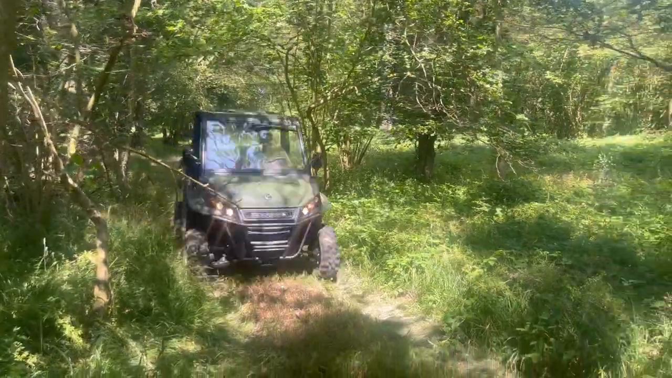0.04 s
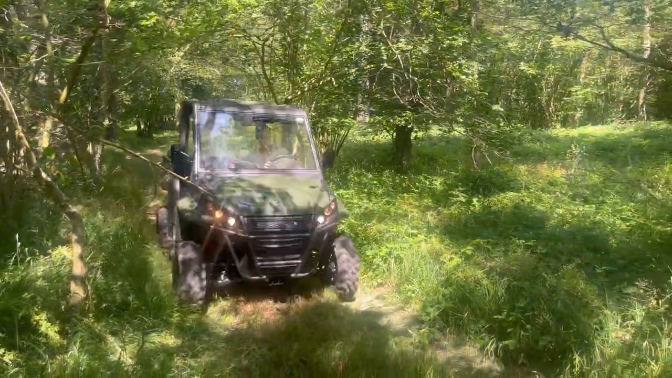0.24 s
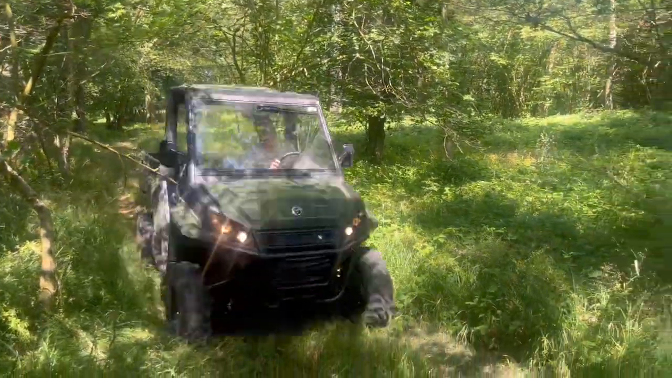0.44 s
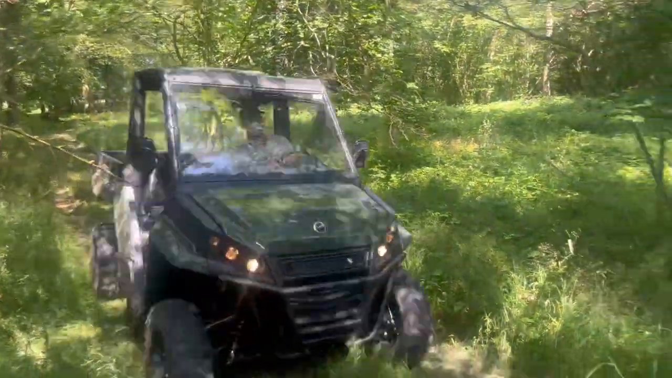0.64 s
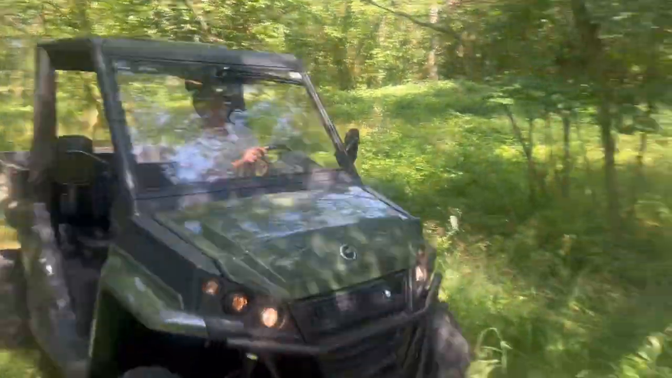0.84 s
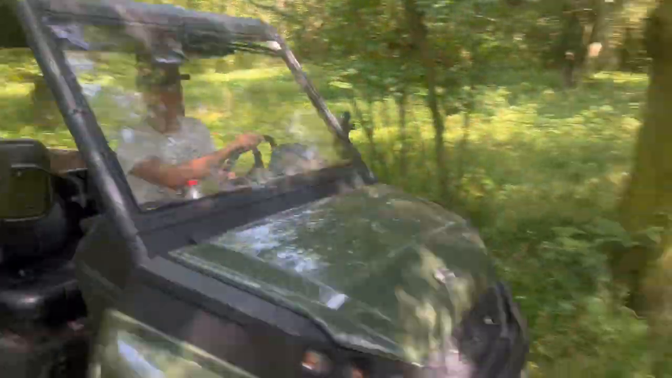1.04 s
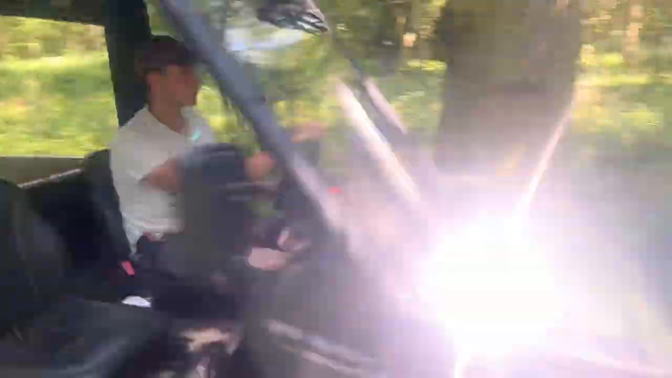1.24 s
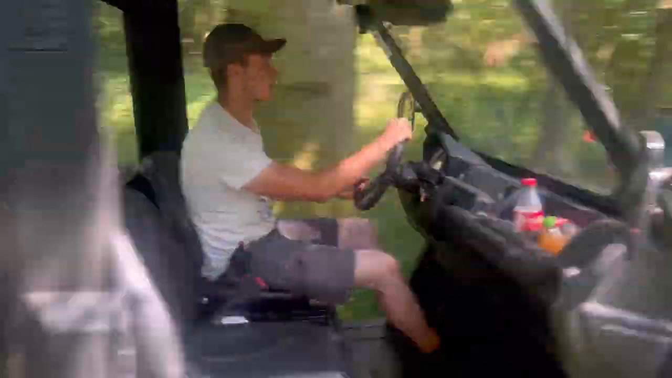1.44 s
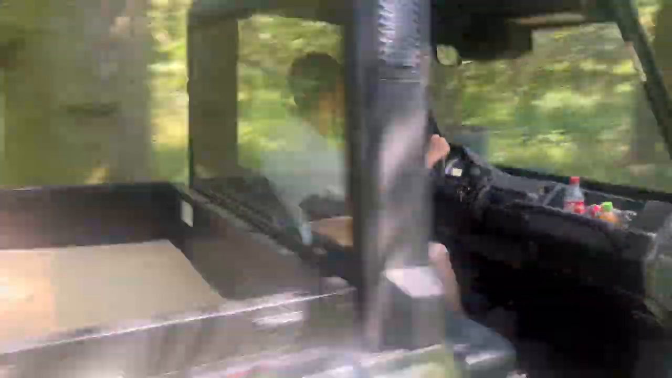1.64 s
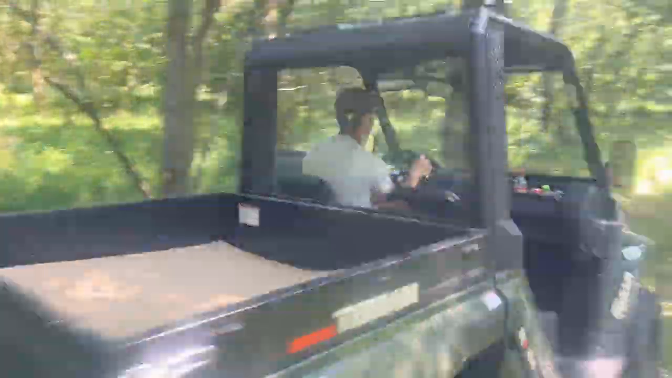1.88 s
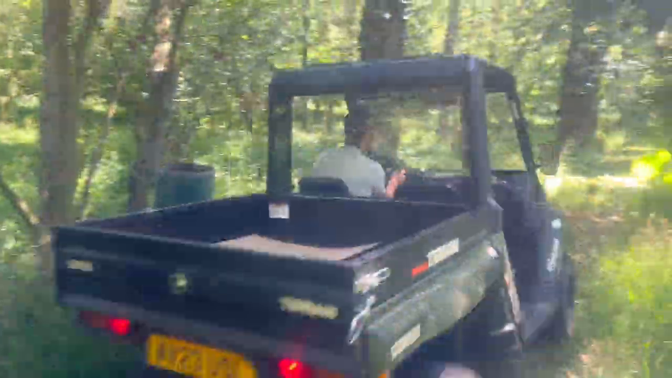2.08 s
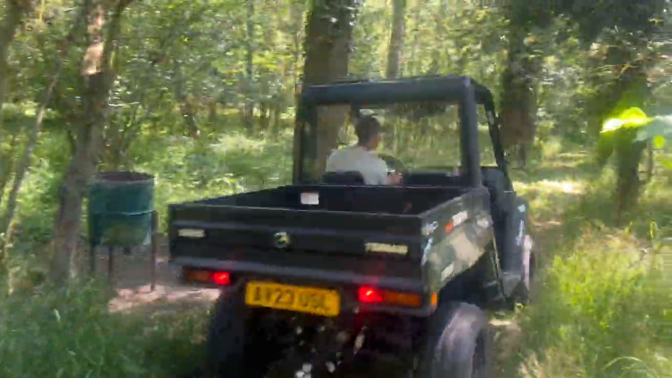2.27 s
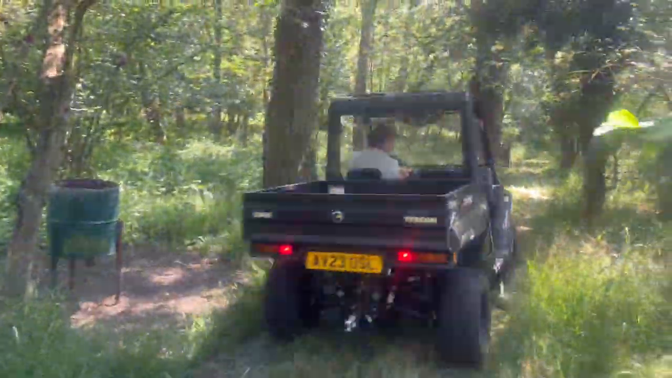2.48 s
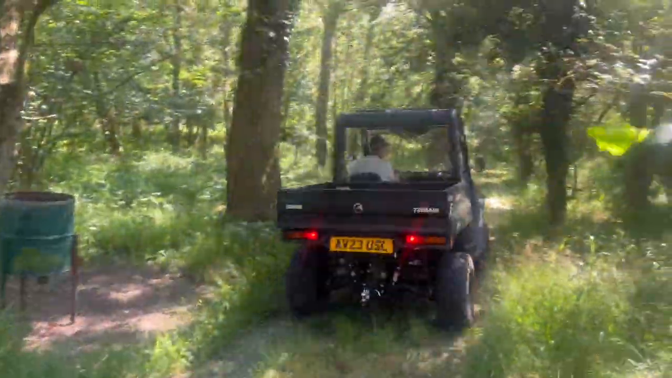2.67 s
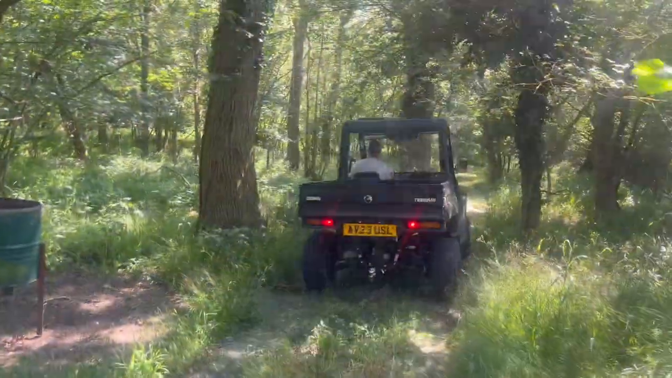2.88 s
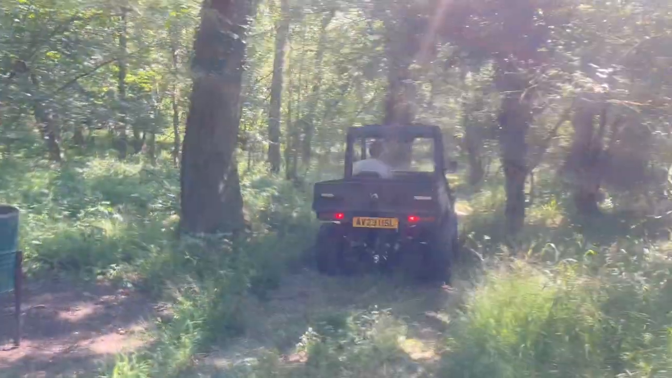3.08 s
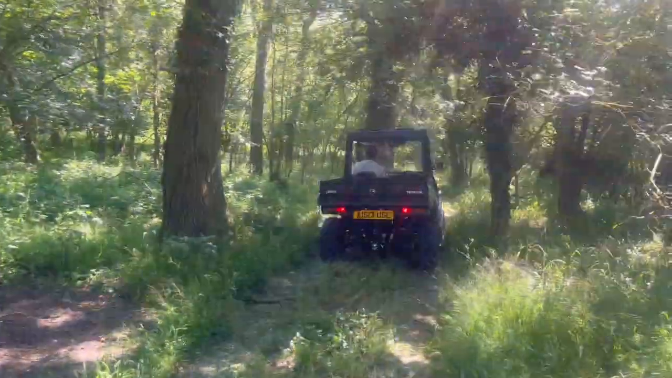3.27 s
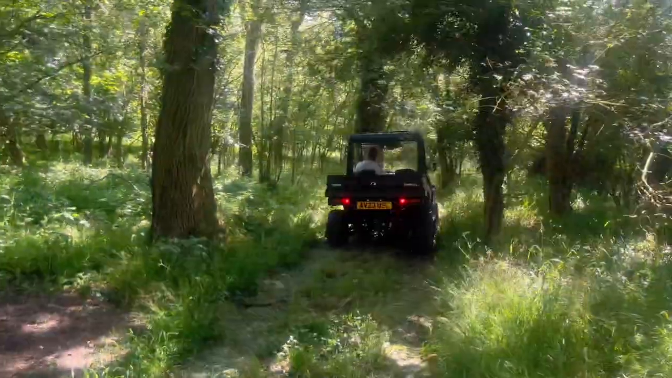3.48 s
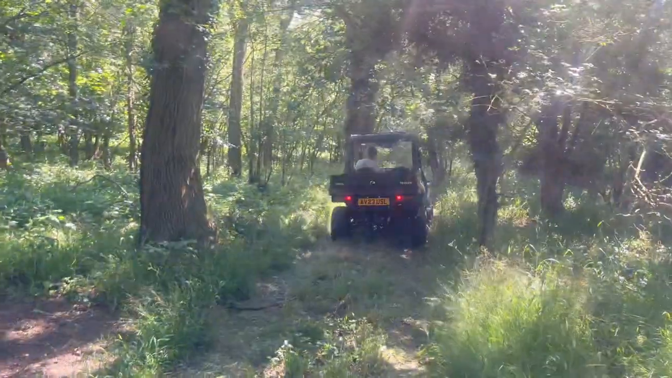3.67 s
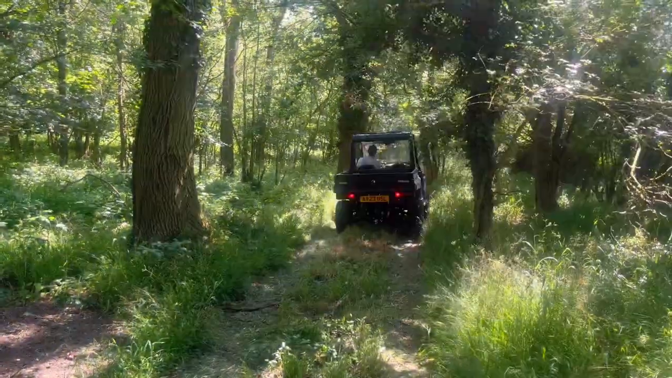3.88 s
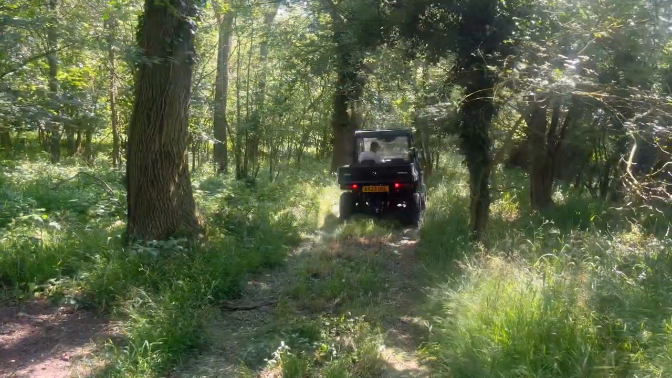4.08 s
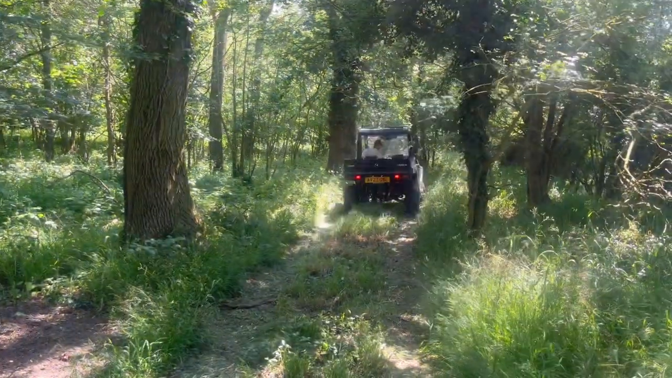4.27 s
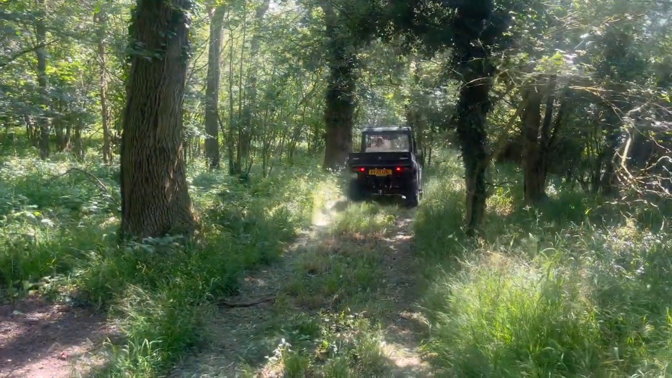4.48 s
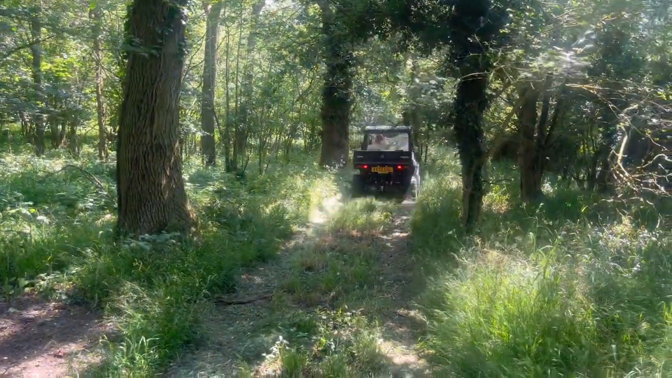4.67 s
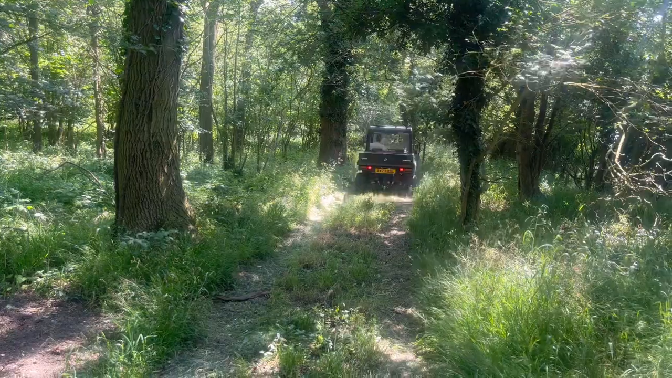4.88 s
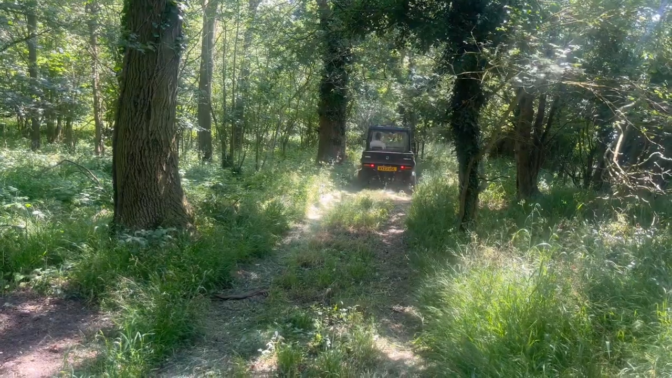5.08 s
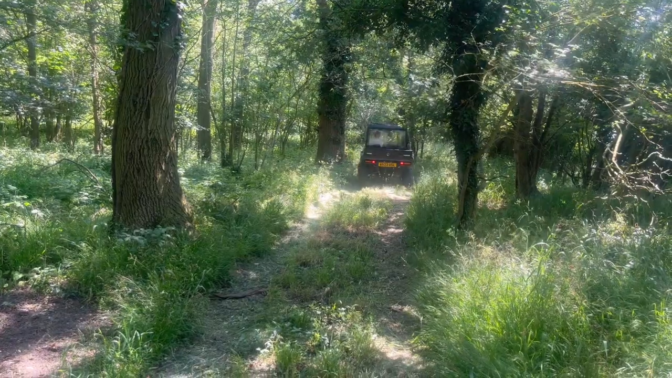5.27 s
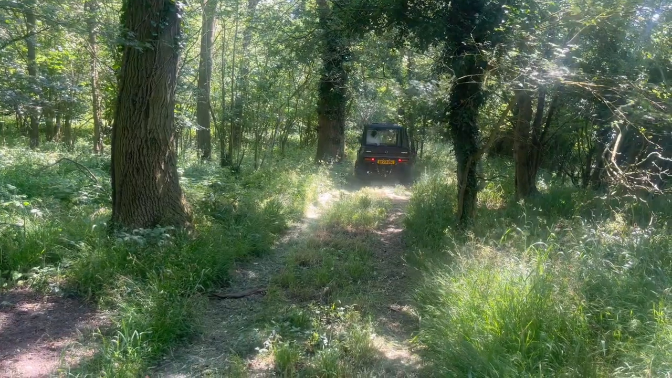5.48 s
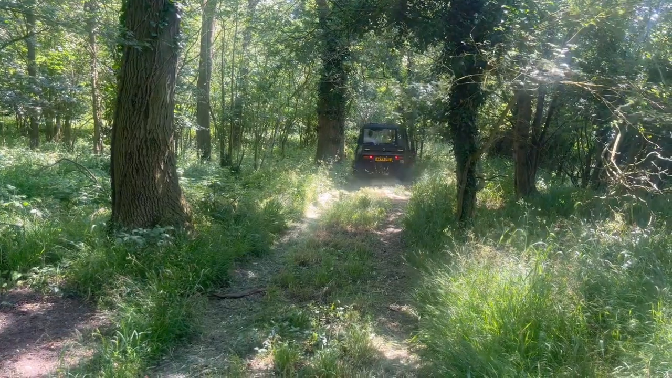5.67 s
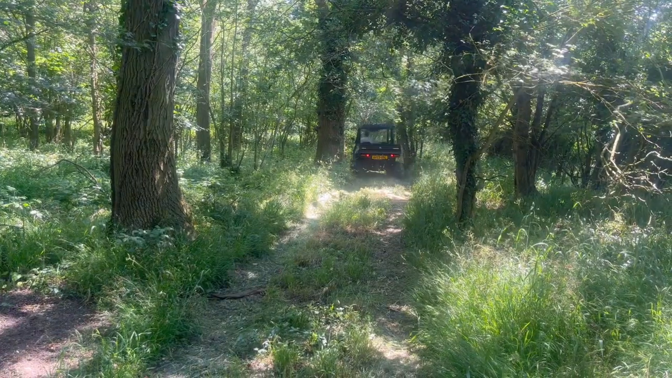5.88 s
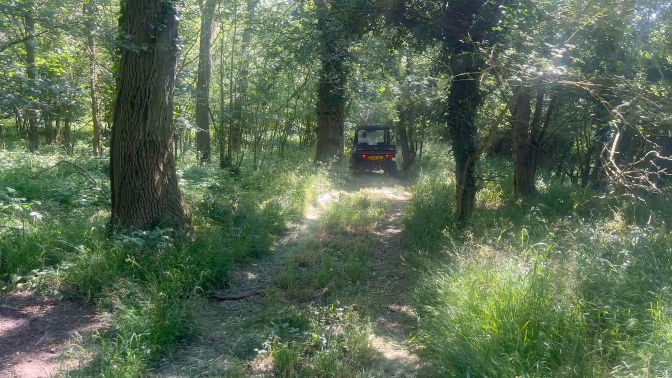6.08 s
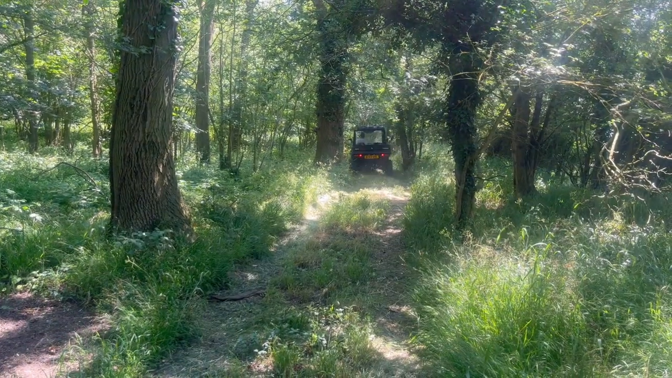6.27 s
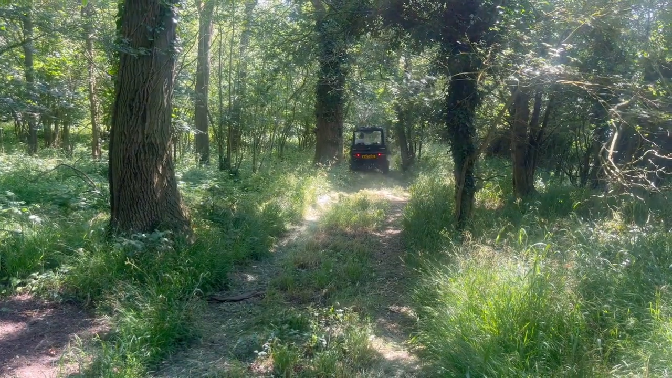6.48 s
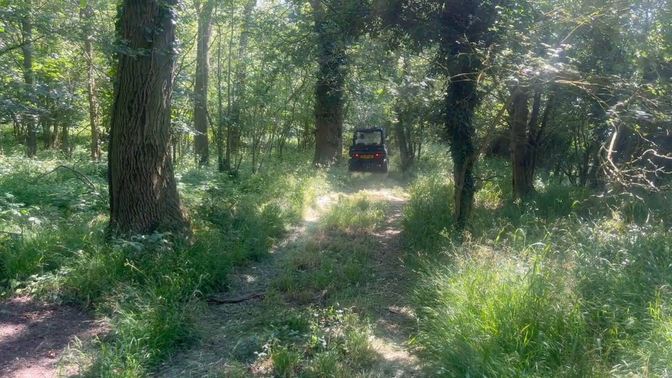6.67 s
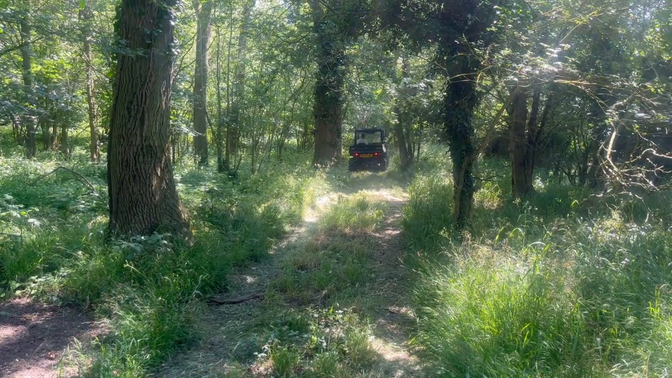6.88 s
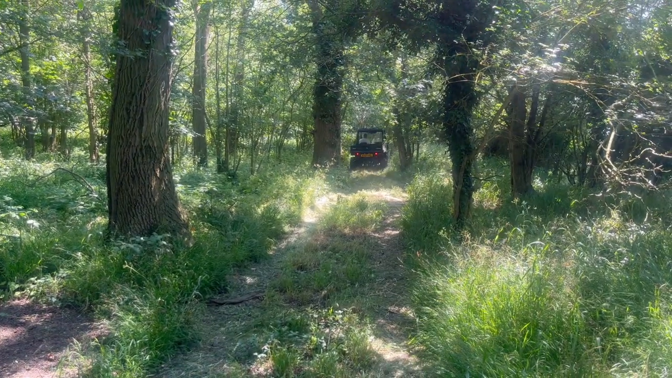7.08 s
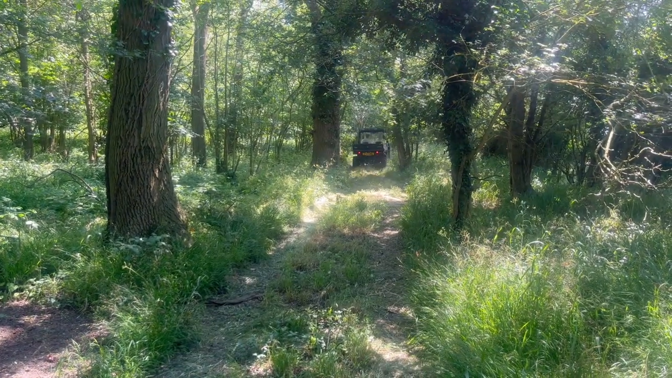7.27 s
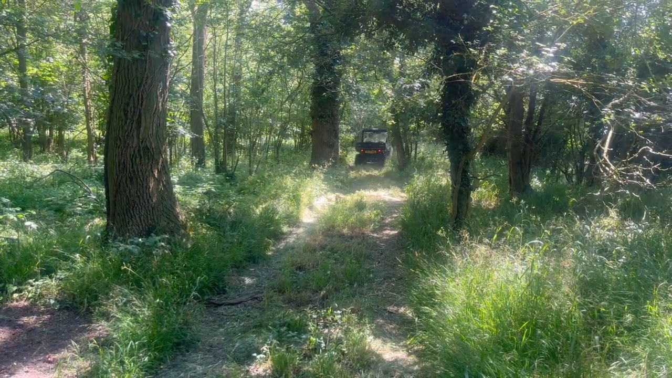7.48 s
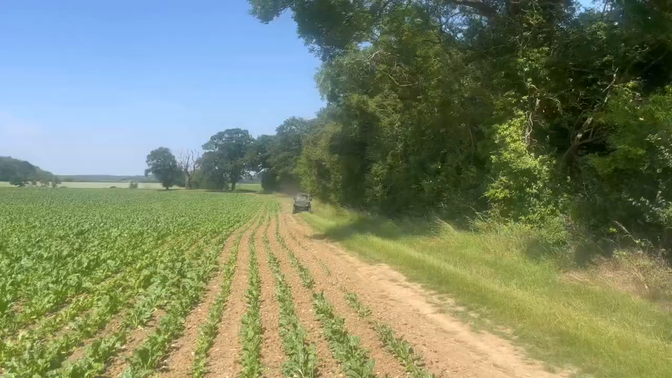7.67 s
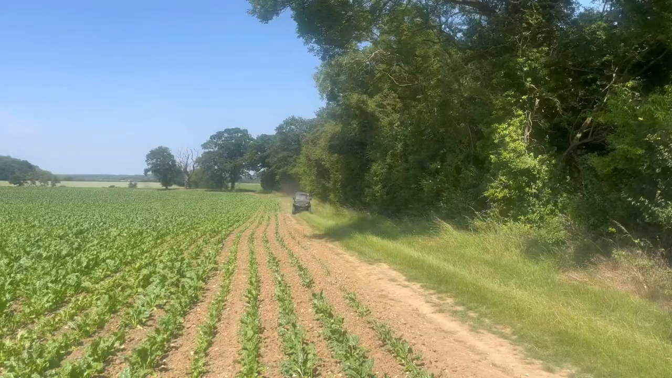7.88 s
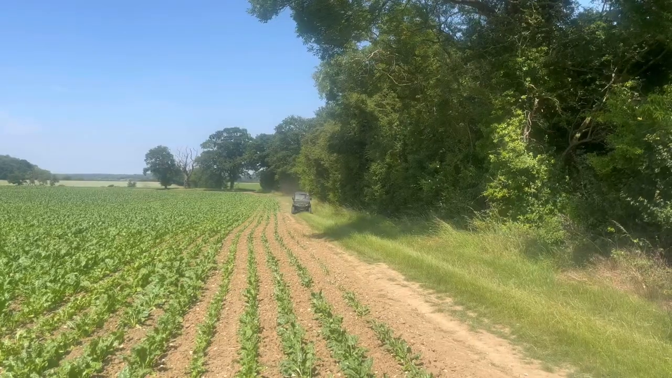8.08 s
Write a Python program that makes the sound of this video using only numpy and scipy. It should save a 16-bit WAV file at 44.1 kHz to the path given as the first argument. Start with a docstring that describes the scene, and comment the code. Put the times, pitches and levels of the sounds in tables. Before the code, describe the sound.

Outdoors on a woodland track, a small three-cylinder utility vehicle approaches with a low throbbing engine and snapping twigs. It passes very close to a handheld stereo phone at about 1.6 seconds, with clatter, tyre hiss, raspy ringing and a load-bed boom. A sharp twig crack follows as it recedes, revs wavering and briefly surging through leaves. Finally an abrupt cut leaves a faint, steady engine far across a field.

```python
"""Twigs snap as a three-cylinder utility vehicle comes up a woodland track, close by two microphone ports.
It passes and drives away under the trees; then it is heard far off across an open field.
The engine is a sum of orders of its cycle; roar, clatter, hiss and leaf litter are bands of noise that throb
with the firings. Bumps, singing panels, rasps and a gear whine are decaying, wavering or sliding tones.
Phase lead, likeness and balance, each drawn over frequency, make the two ports hear them differently."""
import sys
import numpy as np
from scipy import signal
from scipy.fft import rfft, irfft, next_fast_len
from scipy.io import wavfile
from scipy.ndimage import uniform_filter1d

SR = 44100
rng = np.random.default_rng(int(sys.argv[2]) if len(sys.argv) > 2 else 0)


def materialize(psi):
    """Save the field psi as 16-bit PCM at rate SR to the path in sys.argv[1].

    A 1-D psi becomes a single channel; in a 2-D psi each row is a channel.
    """
    bounded = np.clip(np.atleast_2d(psi).T, -1, 1)
    quanta = np.round(bounded * 32767).astype(np.int16)
    wavfile.write(sys.argv[1], SR, quanta)


N = 358974
TIME = np.arange(N) / SR
SIZE = next_fast_len(N)
FREQ = np.arange(SIZE // 2 + 1) * SR / SIZE
FIELD_FROM_S = 7.667
UNDER_TREES = TIME < FIELD_FROM_S
USUAL_REVS_HZ, FIELD_REVS_HZ = 23.5, 28.15  # engine cycles a second

# Engine orders with levels of their own, in multiples of the engine cycle.
TRACKED_ORDERS = [3, 4, 6, 7, 8, 9, 12, 18, 24]
# Edges in Hz of the five noise bands: ground rumble, exhaust roar, clatter, fan and tyre hiss, leaf rustle.
BAND_EDGES_HZ = [45, 300, 900, 2500, 8000, 20000]
# Phase between the ports, beside the vehicle and behind it. Each row: frequency in Hz, lead in radians.
NEAR_LEAD = [(60, .15), (350, .2), (570, .6), (800, 1.5), (1100, 1.6), (1400, 2.2), (2100, 3.2), (2800, 3),
             (6800, -1), (8200, -3.14), (9500, -4.4), (11000, -6.28), (12800, -6.28), (14700, -9.4)]
FAR_LEAD = [(60, -.1), (400, -.2), (590, -.9), (780, .9), (1100, -.1), (1350, -.8), (1750, -1.2),
            (1880, -4.9), (2150, -4.7), (2700, -3.5), (3400, -1), (4100, -1), (4900, -2.8), (5500, -3.2),
            (6000, -6.9), (6600, -7.5), (7800, -9.42), (9500, -10.7), (11000, -12.57), (12800, -12.57),
            (14700, -15.7)]
# Likeness of the ports behind the vehicle and across the field. Each row: frequency in Hz, likeness 0-1.
FAR_ALIKE = [(30, .8), (70, .35), (200, .6), (350, .85), (750, .6), (1100, .92), (1600, .88), (2500, .65),
             (3200, .45), (3900, .75), (5900, .35), (7500, .97), (8300, .99), (9500, .6), (11000, .99),
             (12800, .99), (13800, .55), (14800, .98)]
# First port over the second, beside the vehicle and elsewhere. Each row: frequency in Hz, balance in dB.
NEAR_BALANCE = [(60, -1.5), (200, -.5), (280, -2), (570, -4), (800, 0.5), (1400, 4), (2100, -5),
                (4000, 7.5), (7500, 1.5), (14000, -1.5)]
FAR_BALANCE = [(60, -0.4), (300, -0.5), (570, -8), (800, -2), (1600, -0.5), (2070, -6), (2800, 2.5),
               (4000, 6), (6000, 0), (7500, 5.5), (14000, -3)]


def undb(db):
    """Gain of a level in dB."""
    return 10 ** (np.asarray(db) / 20)


def along(table):
    """Columns of (s, value, ..) rows for every sample."""
    s, *columns = np.transpose(table)
    return [np.interp(TIME, s, column) for column in columns]


def across(table):
    """A (Hz, value) table drawn along the frequency axis, straight in log frequency."""
    hz, value = np.transpose(table)
    return np.interp(np.log(FREQ + 1), np.log(hz + 1), value)


def walk(rate):
    """Random levels held 1 / rate s and slewed twice; spread near 1."""
    hold = int(SR / rate)
    steps = np.repeat(rng.standard_normal(N // hold + 1), hold)
    return 1.296 * uniform_filter1d(uniform_filter1d(steps, hold), hold)[:N]


def resonance(offset_hz, width_hz):
    """Height 0-1 of a resonance at an offset from its centre; half height at half the width."""
    return 1 / (1 + (2 * offset_hz / width_hz) ** 2)


def ports(shared, scattered, lead, alike, balance):
    """Spectra at both ports: a shared part shifted in phase and a scattered part of opposite sign."""
    like = np.clip(across(alike), 0, 1)
    side = np.array([[1], [-1]])
    mixed = np.sqrt((1 + like) / 2) * shared + side * np.sqrt((1 - like) / 2) * scattered
    return mixed * np.exp(.5j * side * across(lead)) * undb(side * across(balance) / 2)


def direct(sound, lead, balance):
    """A sound that reaches both ports by one path, with nothing scattered."""
    return irfft(ports(rfft(sound, SIZE), 0, lead, [(60, 1)], balance), SIZE)[:, :N]


def pass_levels(pattern, field_db, rate):
    """Level of each part by bearing, distance and engine speed as the vehicle passes; steady across the field."""
    passes_s, speed_m_s, kerb_m = 1.6, 2.5, 1.5
    # Bearings in degrees at which the vehicle is heard: nose -90, side 0, tail 90.
    bearings_deg = [-65, -50, -30, -10, 15, 35, 55, 75]
    gone_m = speed_m_s * (TIME - passes_s)
    bearing = np.degrees(np.arctan2(gone_m, kerb_m))
    doublings = np.log2(np.hypot(gone_m, kerb_m) / kerb_m)
    out = []
    for (fade_db, revs_db, kerb_db), steady_db in zip(pattern, field_db):
        passing_db = np.interp(bearing, bearings_deg, kerb_db) - fade_db * doublings
        passing_db += revs_db * (rate - USUAL_REVS_HZ)
        out.append(np.where(UNDER_TREES, passing_db, steady_db))
    return out


def order_levels(rate, low_db, sixth_db, middle_db):
    """Levels of the tracked orders: the pass and the wavering on top of it."""
    # One row per tracked order: dB lost per doubling of distance, dB gained per extra cycle a second,
    # list of dB at the kerb on each bearing.
    order_pattern = [(4.5, -0.6, [-17.5, -17, -17, -15, -15, -17, -22.5, -20]),
                     (7, -2.5, [-20, -19.5, -25, -42, -21, -32, -31, -25]),
                     (8, -0.46, [-15.5, -20.5, -23, -21.5, -28.5, -23, -18.5, -14.5]),
                     (8, 5.5, [-29.5, -28.5, -25, -33, -32, -28, -26, -21]),
                     (12, 1, [-16.5, -20, -39, -26.5, -26, -25, -19.5, -13]),
                     (8.5, 0, [-24.5, -36, -40, -24.5, -24, -43, -36, -20.5]),
                     (8.5, 1.5, [-46, -29, -30.5, -23, -29.5, -31.5, -41.5, -33]),
                     (8.5, 0.5, [-41, -39.5, -40, -29.5, -40, -26.5, -48, -40.5]),
                     (8.5, -0.4, [-43, -48, -39.5, -35, -37, -37.5, -33.5, -40.5])]
    # Level in dB of each tracked order across the field.
    field_engine_db = [-37, -51, -40.5, -47, -70, -56.5, -61, -74, -67]
    # Wavering of order 12 and of orders from 18 up, on the approach and after the pass.
    # Each row: time in seconds, dB of order 12, dB of orders from 18 up.
    upper_waver = [(1.0, -1, -2.5), (1.55, -3, 1.5), (1.9, 3.5, -1.5), (2.08, -13, -4.5), (2.5, 1.2, -5),
                   (3.5, 1.8, -0.5), (4.1, -2, -4), (4.7, 0.2, 0), (5.42, 0, -1.5), (5.6, -2, 2),
                   (6.3, 3, -3), (6.65, -3, 0.5), (7.15, -2, 3.5), (7.6, -1.5, 2.5)]
    twelfth_db, high_db = np.array(along(upper_waver)) * UNDER_TREES
    out = []
    for k, db in zip(TRACKED_ORDERS, pass_levels(order_pattern, field_engine_db, rate)):
        waver_db = low_db if k <= 4 else sixth_db if k == 6 else middle_db
        out.append(db + waver_db + (k == 12) * twelfth_db + (k >= 18) * high_db)
    return out


def band_levels(rate, ground_db, roar_db, hiss_db):
    """Levels of the noise bands: the pass, the wavering and swells of revs and thrashed undergrowth."""
    # One row per noise band: dB lost per doubling of distance, dB gained per extra cycle a second,
    # list of dB at the kerb on each bearing.
    noise_pattern = [(6.17, -0.89, [-30, -27.5, -24, -30, -23, -18, -24, -18]),
                     (6.8, 0.028, [-32.5, -28, -24.5, -24.5, -23.5, -25.5, -24.5, -31.5]),
                     (5.9, 0.94, [-34, -32, -31.5, -27, -27.5, -30, -33, -30]),
                     (3.85, 0.19, [-54.5, -41.5, -37.5, -30.5, -30, -32.5, -33.5, -37.5]),
                     (6.83, 0.69, [-38.5, -40, -40.5, -37, -40, -45, -47, -43.5])]
    # Level in dB of each noise band across the field.
    field_noise_db = [-52, -53.5, -59, -67.5, -84]
    # The engine revs and wheels thrash through undergrowth. Each row: start in seconds, end in seconds,
    # rise in dB of roar and hiss, rise in dB of clatter, rise in dB of leaf rustle.
    swells = [(5.334, 5.65, 3.5, 5.8, 9), (7.477, 7.596, 3.5, 1.8, 3.3)]
    rumble_db, *upper_db = pass_levels(noise_pattern, field_noise_db, rate)
    rise_db = np.zeros((3, N))
    for start, end, *db in swells:
        swell = np.interp(TIME, [start - .03, start + .042, end - .05, end + .05], [0, 1, 1, 0])
        rise_db += np.outer(db, swell * (1 + .11 * walk(25)))
    swell_db, clatter_db, rustle_db = rise_db
    rises = [swell_db + roar_db, clatter_db + roar_db, swell_db + hiss_db, rustle_db + hiss_db]
    return [rumble_db + ground_db] + [db + rise for db, rise in zip(upper_db, rises)]


def engine(cycle, rate, order_db, behind):
    """Orders of the cycle in step, so they form pulses: suction from the front, slanted pressure from the exhaust."""
    # The weaker orders, in multiples of the engine cycle.
    weak_orders = [2, 5, 10, 11, 13, 14, 15, 16, 17, 19, 20, 21, 22, 23, 25, 26, 27, 28, 30, 31, 33, 36, 42,
                   45, 48, 50, 54, 60, 63]
    # Their levels in dB re the mean of the tracked orders, re order 24 from order 19 up.
    weak_db = [-16, -11, -10.5, -13, -15.5, -12.5, -13.5, -16.5, -16, -8, -3.5, -7, -3, 1.5, -1.5, -0.5, -4,
               1, -6, -3, -7, -7, -11, -13, -18, -18, 1, -2.5, -6]
    # Exhaust resonances that shape whichever order lies in them. Each row: centre in Hz, width in Hz,
    # change in dB beside the vehicle, change in dB behind it, below 0 for a dip.
    exhaust_rings = [(277.3, 17.7, 13, 15), (355, 50, 6.5, 0.5), (383, 28, -4.5, 9.5), (559.5, 24, 2.5, 9),
                     (588, 26, 4, -2)]
    turn = 2.3 - 2.5 * np.clip(3 * behind, 0, 1)
    mean_db = np.mean(order_db, axis=0)
    high_db = order_db[-1] - 8 * ~UNDER_TREES  # the weak high orders sink across the field
    parts = list(zip(TRACKED_ORDERS, order_db))
    parts += [(k, (mean_db if k < 19 else high_db) + db) for k, db in zip(weak_orders, weak_db)]
    out = np.zeros(N)
    for k, db in parts:
        # uneven burning makes every order waver, the high ones most
        shake = .05 * np.sqrt(k) * walk(6)
        waver_db = np.sqrt(k) * (.35 * walk(10) + (.2 if k in TRACKED_ORDERS else .6) * walk(4))
        # orders off the firing rate come from differences between cylinders and keep no common step;
        # those above order 12 keep none either
        offset = turn if k % 3 == 0 and k <= 12 else rng.uniform(0, 2 * np.pi)
        ring_db = np.zeros(N)
        for hz, width, near_db, far_db in exhaust_rings:
            if abs(k * USUAL_REVS_HZ - hz) < 120:
                ring_db += (near_db + behind * (far_db - near_db)) * resonance(k * rate - hz, width)
        level_db = db + UNDER_TREES * ring_db + waver_db
        out += np.sqrt(2) * undb(level_db) * np.cos(k * cycle + offset + shake)
    return out


def noises(cycle, band_db, colour, rings, lead, alike, balance):
    """Bands of noise on their own levels, each throbbing with the firings and flickering."""
    # Depth of the throb in each band, as a share of its amplitude.
    gate_depth = [0.021, 0.026, 0.082, 0.1, 0.11]
    # Flicker scale of each band in dB.
    flicker_db = [1.3, .8, .9, .9, .7]
    throb = np.cos(3 * cycle) + .5 * np.cos(cycle)
    colour_db = across(colour) + sum(db * resonance(FREQ - hz, width) for hz, width, db in rings)
    pair = ports(*rfft(rng.standard_normal((2, SIZE))), lead, alike, balance) * undb(colour_db)
    out, gust = np.zeros((2, N)), walk(8)  # the gust is common to all bands
    for k, db in enumerate(band_db):
        lo, hi = BAND_EDGES_HZ[k:k + 2]
        mask = np.sqrt(1 / (1 + (lo / (FREQ + 1)) ** 8) / (1 + (FREQ / hi) ** 8))
        band = irfft(pair * mask, SIZE)[:, :N]
        band /= np.std(band.mean(axis=0))
        flicker = flicker_db[k] * (walk(20 if k else 7) + .5 * gust)
        out += band * undb(db + flicker) * (1 + gate_depth[k] * throb)
    return out


def woodland_noise(cycle, band_db, behind):
    """Vehicle noise under the trees, blended in power from beside the vehicle to behind it."""
    # Colour of the noise beside and behind the vehicle. Each row: frequency in Hz, density in dB per Hz.
    near_colour = [(60, 23.0), (200, 13.5), (350, 2.0), (550, -5.0), (800, -7.5), (1200, -8.0),
                   (1600, -5.0), (1900, -9.0), (2200, -18.0), (2800, -16.0), (3800, -15.5), (5200, -22.0),
                   (7000, -36.5), (9000, -38.5), (12000, -40.5), (14500, -45.0)]
    far_colour = [(60, 15.8), (200, 5.0), (350, -5.5), (550, -6.5), (800, -9.5), (1200, 0.0), (1600, -1.5),
                  (1900, -2.5), (2200, -4.5), (2800, -7.0), (3800, -11.0), (5200, -16.5), (7000, -30.5),
                  (9000, -21.5), (12000, -21.5), (14500, -24.5)]
    # Rings and dips in the noise. Each row: centre in Hz, width in Hz, rise in dB, below 0 for a dip.
    near_rings = [(603, 35, 8.5), (732, 37, 7), (1314, 70, 3.5), (1440, 100, 2), (2430, 140, 5),
                  (2780, 370, -2.5), (4100, 1100, 1), (5500, 270, 4.5)]
    far_rings = [(573, 60, 10.5), (1020, 400, 5.5), (1200, 30, 2.5), (1500, 76, 6), (1650, 125, 7),
                 (1350, 80, -0.5), (1850, 84, -4), (2019, 59, 8), (2880, 370, -3.5), (3870, 300, 2.5),
                 (4320, 72, 4.5), (6430, 1630, 9)]
    # Likeness of the ports beside the vehicle. Each row: frequency in Hz, likeness 0-1.
    near_alike = [(30, .7), (70, .25), (200, .5), (350, .85), (600, .75), (800, .9), (1400, .6), (2200, .4),
                  (6500, .1), (7700, .85), (8300, .97), (9100, .5), (11000, .99), (12800, .99),
                  (13800, .55), (14800, .97)]
    near = noises(cycle, band_db, near_colour, near_rings, NEAR_LEAD, near_alike, NEAR_BALANCE)
    far = noises(cycle, band_db, far_colour, far_rings, FAR_LEAD, FAR_ALIKE, FAR_BALANCE)
    return np.sqrt(1 - behind) * near + np.sqrt(behind) * far


def streaks(band_db):
    """Short tonal streaks at random pitches that make the noise patchy, each near the level of its noise band."""
    count, length_s, low_hz, high_hz, streak_db = 500, .07, 330, 4500, -7.5
    out = np.zeros(N)
    for when, pitch, size, long in rng.uniform(size=(count, 4)):
        hz = low_hz * (high_hz / low_hz) ** pitch
        n = int(length_s * (.5 + long) * SR)
        i = int(when * (FIELD_FROM_S * SR - n))
        db = band_db[np.searchsorted(BAND_EDGES_HZ, hz) - 1][i] + streak_db + 10 * (size - .5)
        t = TIME[:n]
        glide = 1 + .1 * (long - .5) * t
        out[i:i + n] += undb(db) * np.hanning(n) * np.sin(2 * np.pi * hz * t * glide)
    return out


def rasps():
    """Narrow rasping rings of noise that slide as the engine bay turns past."""
    # One table per rasp. Each row: time in seconds, centre in Hz, level in dB.
    rasp_tables = [
        [(1.25, 1600, -55), (1.42, 1538, -22), (1.6, 1440, -30), (1.75, 1375, -29), (1.95, 1318, -32),
         (2.15, 1305, -52)],
        [(1.4, 1150, -59.5), (1.5, 1200, -38), (1.6, 1168, -39.5), (1.7, 1195, -24), (1.85, 1200, -50)],
        [(1.2, 1650, -56), (1.36, 1730, -36), (1.55, 1650, -28), (1.76, 1756, -41), (1.95, 1720, -45)],
        [(1.8, 1071, -51), (2.2, 1020, -32), (2.5, 1030, -57)],
    ]
    width_hz = 80  # rate of the random swings that broaden each ring
    out = np.zeros(N)
    for table in rasp_tables:
        hz, db = along(table)
        turn = 2 * np.pi * np.cumsum(hz) / SR
        heard = (TIME > table[0][0]) & (TIME < table[-1][0])
        out += heard * undb(db) * (walk(width_hz) * np.cos(turn) + walk(width_hz) * np.sin(turn))
    return out


def bumps():
    """The body and load bed boom when a wheel drops: struck modes that die away."""
    # Wheels over ruts and roots, panels struck. Each row: start in seconds, level in dB before the decay,
    # pitch in Hz, ring t60 in seconds.
    knocked = [(1.82, -5, 61.5, 0.15), (2, -18, 56, 0.48), (1.999, -21.5, 430.5, 0.98),
               (2.972, -16, 59, 0.3), (3.09, -16.5, 444, 0.076), (4.04, -15, 74, 0.15),
               (4.085, -13, 80, .1), (5.399, -37.5, 431, 0.9)]
    out = np.zeros(N)
    for s, db, hz, t60 in knocked:
        t = np.clip(TIME - s, 0, None)
        out += undb(db) * (1 - np.exp(-t / 0.007)) * 1000 ** (-t / t60) * np.sin(2 * np.pi * hz * t)
    return out


def whine():
    """A thin wavering gear tone as the vehicle pulls past."""
    # Each row: time in seconds, pitch in Hz, mean level in dB.
    gear_tone = [(1.3, 1300, -50), (1.95, 1305, -41), (2.1, 1292, -33), (2.3, 1288, -33), (2.5, 1290, -40),
                 (3.1, 1285, -45)]
    hz, db = along(gear_tone)
    fade = np.interp(TIME, [1.2, 1.4, 3.0, 3.2], [0, 1, 1, 0])
    level = np.sqrt(2) * fade * undb(db + 3.5 * walk(15))
    return level * np.sin(2 * np.pi * np.cumsum(hz) / SR + .7 * walk(25))


def strands(clatter_db, behind):
    """Loose panels sing behind the vehicle: narrow rings of noise, each swelling and fading alone."""
    # Each row: pitch in Hz, wander in Hz, level in dB re the clatter.
    panels = [(385, 25, -17), (1060, 50, -13), (1185, 50, -14), (1490, 40, -14), (1640, 50, -12),
              (2050, 60, -13)]
    out = np.zeros(N)
    for hz, wander, db in panels:
        turn = 2 * np.pi * hz * np.cumsum(1 + .015 * walk(2)) / SR
        ring = walk(wander) * np.cos(turn) + walk(wander) * np.sin(turn)
        out += ring * undb(db + 3 * walk(6))
    return out * undb(clatter_db) * np.sqrt(behind) * UNDER_TREES


def flares():
    """A panel sings out briefly: short swells of a ring that wavers in level and phase."""
    # Each row: middle in seconds, half length in seconds, pitch in Hz, level in dB.
    sung = [(3.1, .1, 1077, -42.5), (3.417, 0.11, 1487, -38.5), (3.86, 0.12, 1507, -44.5),
            (4.38, 0.11, 1382, -45), (4.893, 0.06, 1200, -41)]
    width_hz = 43  # rate of the wavering
    out = np.zeros(N)
    waver = undb(5.9 * walk(width_hz)) * np.exp(1j * walk(width_hz))
    for s, half, hz, db in sung:
        swell = undb(db) * np.exp(-((TIME - s) / half) ** 4)
        out += swell * np.real(waver * np.exp(2j * np.pi * hz * TIME))
    return out


def twigs():
    """A sharp crack with an uneven splintering tail and a short woody knock; treble is set twig by twig."""
    # Each row: start in seconds, crack level in dB, tail t60 in seconds, treble in dB re the crack,
    # knock of the wood in Hz, knock level in dB (its amplitude is doubled below).
    snapped = [(0.059, -30, 0.058, 2, 1200, -43), (0.0964, -32, .08, 6, 615, -19),
               (0.6368, -23.5, 0.11, 9, 1020, -12), (0.7844, -31, 0.075, 6, 1410, -28),
               (2.863, -32, 0.04, 9, 1120, -36), (2.8672, -14.5, 0.11, -9, 1430, -11),
               (2.879, -33, .04, 8, 1500, -36), (2.8844, -30, 0.03, 1.5, 1280, -33)]
    crack_t60_s, tail_db, knock_t60_s = .005, -11, .008
    shape, knocks = np.zeros((2, N)), np.zeros(N)
    for s, db, t60, treble_db, hz, knock_db in snapped:
        at = slice(int(s * SR), int((s + .3) * SR))
        t = np.clip(TIME[at] - s, 0, None)
        tail = undb(tail_db + 3 * walk(300)[at]) * 1000 ** (-t / max(t60, .005))
        shape[:, at] += undb([[db], [db + treble_db]]) * (1000 ** (-t / crack_t60_s) + tail)
        knock = (1 - np.exp(-(t / .0014) ** 2)) * 1000 ** (-t / knock_t60_s)
        knocks[at] += 2 * undb(knock_db) * knock * np.sin(2 * np.pi * hz * t)
    body = undb(across([(200, 15), (1400, -1.0), (3500, 2.5), (6500, -4.0), (9000, -32)]))
    top = undb(across([(5000, -29), (7500, 1.5), (12000, -8.0)]))
    spectrum = 0
    for part, colour in zip(shape, (body, top)):
        spectrum = spectrum + rfft(part * rng.standard_normal((2, N)), SIZE) * colour
    lead = [(60, 0), (6000, 0), (8100, -3.14), (11000, -6.28)]
    alike = [(60, .9), (14000, .9)]
    return irfft(ports(*spectrum, lead, alike, FAR_BALANCE), SIZE)[:, :N] + knocks


def field_noise(cycle, band_db):
    """The distant vehicle's noise across the open field, in a colour of its own."""
    # Colour of the noise across the field. Each row: frequency in Hz, density in dB per Hz.
    field_colour = [(60, 14), (200, 2.2), (350, -6.5), (550, -12.5), (800, -17.0), (1200, -7.0),
                    (1600, -8.0), (1900, -11.0), (2200, -11.0), (2800, -18.0), (3800, -21.5), (5200, -18.0),
                    (7000, -36.0), (9000, -38.0), (12000, -43.0), (14500, -52.1)]
    # Rings in the noise. Each row: centre in Hz, width in Hz, rise in dB.
    field_rings = [(627, 51, 11), (1440, 110, 11.6), (1920, 49, 5), (4570, 180, 5.5)]
    return noises(cycle, band_db, field_colour, field_rings, FAR_LEAD, FAR_ALIKE, FAR_BALANCE)


def scene():
    """The vehicle's tones and noise blend from beside to behind, then give way to the field."""
    # Engine speed under the trees. Each row: time in seconds, engine cycles a second.
    revs = [(0.0, 23.8), (0.7, 23.87), (1.45, 23.85), (1.6, 24.0), (1.95, 24.15), (2.2, 23.8), (2.5, 23.5),
            (2.74, 23.6), (2.82, 23.8), (2.98, 23.4), (3.08, 22.7), (3.28, 22.1), (3.5, 21.95),
            (3.64, 22.25), (4.08, 22.0), (4.28, 21.4), (4.39, 21.3), (4.63, 22.0), (4.81, 22.3),
            (4.97, 22.0), (5.08, 21.1), (5.22, 20.8), (5.31, 22.0), (5.4, 23.8), (5.45, 24.1), (5.57, 23.6),
            (5.93, 23.65), (6.1, 23.5), (6.69, 24.2), (7.08, 24.55), (7.2, 24.45), (7.3, 23.7),
            (7.37, 21.85), (7.49, 21.7), (7.57, 23.2), (7.66, 23.5)]
    # How far the vehicle has passed. Each row: time in seconds, share of sound from behind it 0-1.
    behind_share = [(0, 0), (1.75, 0.15), (2.9, 0.99), (8.14, 1)]
    # The level wavers as the vehicle comes and goes. Each row: time in seconds, dB of orders 3 and 4,
    # dB of order 6, dB of higher orders, dB of rumble, dB of roar and clatter, dB of hiss and rustle.
    wavering = [(0.85, .1, .1, .1, -1, 0.5, -0.76), (1.12, -0.2, .1, -1, -2, -1.5, -0.75),
                (1.3, 1.2, .1, .1, 1.5, 1, .1), (1.7, 0.5, 0.1, 0.1, 0, 0, -0.4),
                (1.88, -0.5, 0.1, 0.1, -2, -0.3, 0.1), (1.96, -2, 0.1, 0.1, 1, -1, -0.55),
                (2.1, 0.5, 0.1, 0.1, -3, 1.1, 0.45), (2.24, 4.5, 0.1, 0.1, 3.5, -0.8, 0.83),
                (2.7, 2.5, 0.1, 0.1, 4.5, -1.5, -0.23), (2.9, -2, -1.5, 0.1, 0, -0.5, 1.5),
                (3.1, 2.5, 0.1, 0.1, 4, -0.4, -1.3), (3.5, 1, -0.2, -0.3, -11, -0.23, 0.68),
                (3.9, 0.5, 0.6, -0.6, -7, 0.7, 1.9), (4.2, -0.5, 0.1, 0.6, -2.5, 2.3, 0.32),
                (4.6, 1.8, 1.1, 1.1, -9.5, 0.2, 1.1), (5.0, -0.5, 1.3, 1.5, -11, 1, 0.07),
                (5.3, 1.5, 1.5, 2.1, -10, -0.9, -0.39), (5.65, 0, -1.5, 2.1, -9, -0.55, -1.6),
                (6.3, -3.5, 1.5, 1.8, -13, 1.9, -0.15), (6.8, -2.5, 0.7, 0.7, -7, 1.3, 1.2),
                (7.25, 1, -1.5, -1.5, -12, 2, 1.5), (7.45, 4, 1.5, 0.1, -10, 1, 0.91),
                (7.66, -3, -2.1, -2.1, 1, -1.5, 0.93)]
    rate = np.where(UNDER_TREES, along(revs)[0], FIELD_REVS_HZ)
    cycle = 2 * np.pi * np.cumsum(rate) / SR
    behind = np.clip(along(behind_share)[0], 0, 1)
    past = np.clip(3 * behind, 0, 1)  # the tones swing over sooner than the noise
    waver_db = np.array(along(wavering)) * UNDER_TREES
    order_db = order_levels(rate, *waver_db[:3])
    band_db = band_levels(rate, *waver_db[3:])
    body = engine(cycle, rate, order_db, behind) + bumps() + streaks(band_db)
    beside_tones = (1 - past) * body + rasps()
    behind_tones = past * body + whine() + flares() + strands(band_db[2], behind)
    tones = direct(beside_tones, NEAR_LEAD, NEAR_BALANCE) + direct(behind_tones, FAR_LEAD, FAR_BALANCE)
    wood = woodland_noise(cycle, band_db, behind)
    return tones + np.where(UNDER_TREES, wood, field_noise(cycle, band_db)) + twigs()


def record(dry):
    """The phone's microphones cut the deepest bass, round the loudest peaks and cut the top."""
    dry = signal.sosfilt(signal.butter(2, 35, "high", fs=SR, output="sos"), dry)
    rounded = np.tanh(.9 * dry) / .9
    return signal.sosfilt(signal.ellip(8, .2, 70, 14600, fs=SR, output="sos"), rounded)


dry = scene()
out = record(dry)
materialize(out)
```